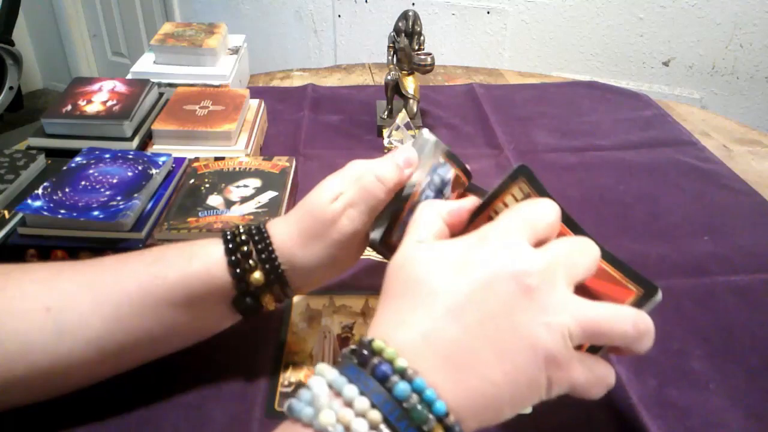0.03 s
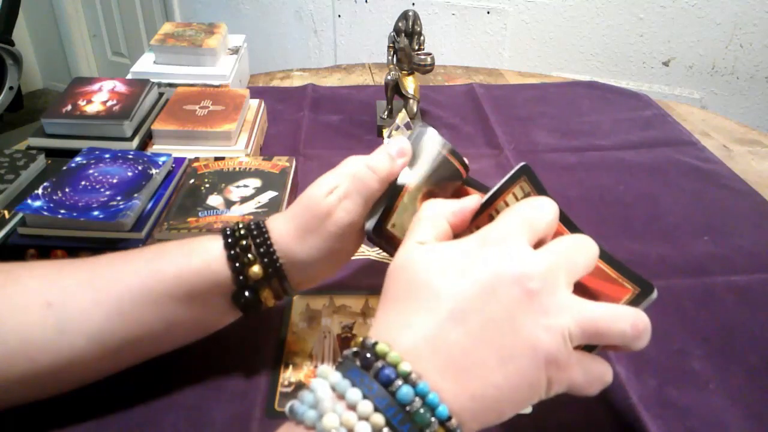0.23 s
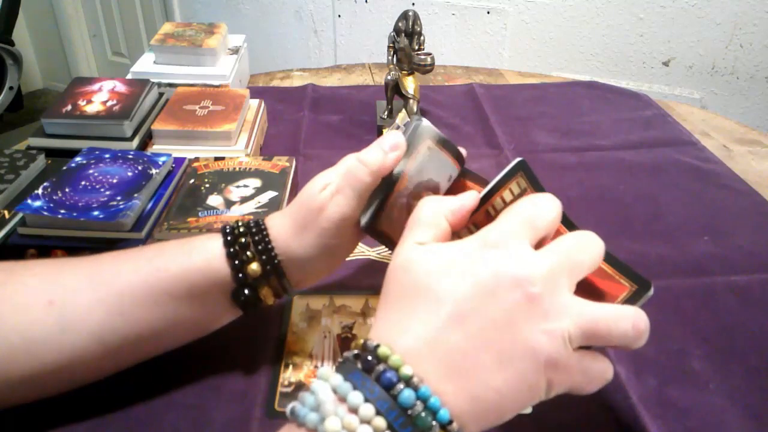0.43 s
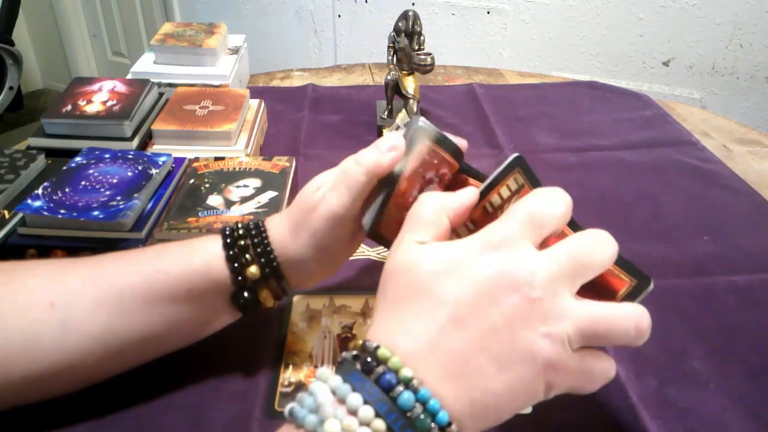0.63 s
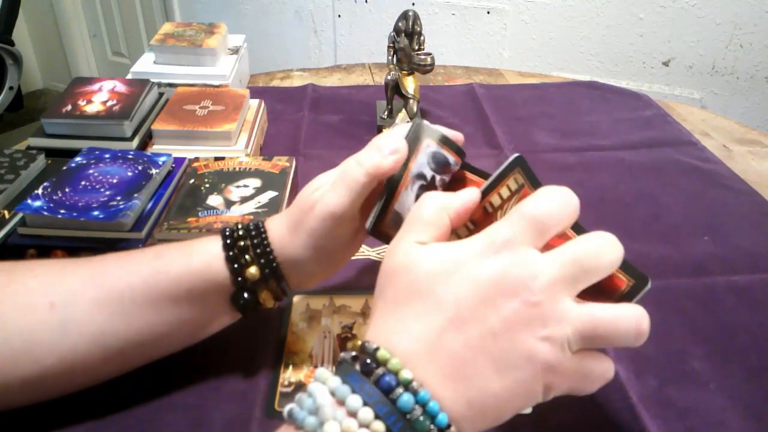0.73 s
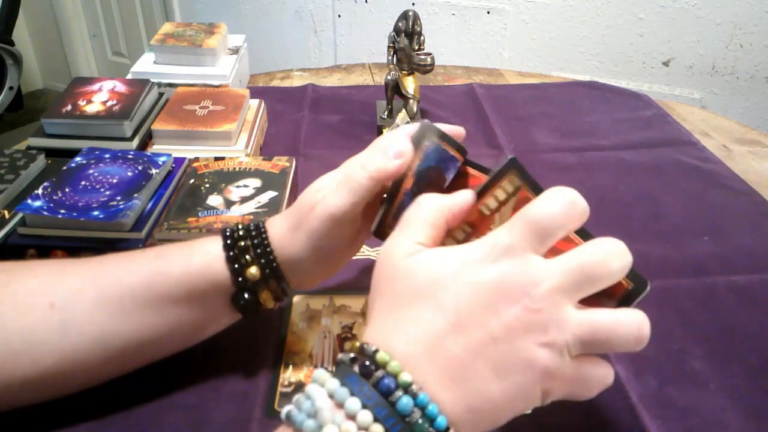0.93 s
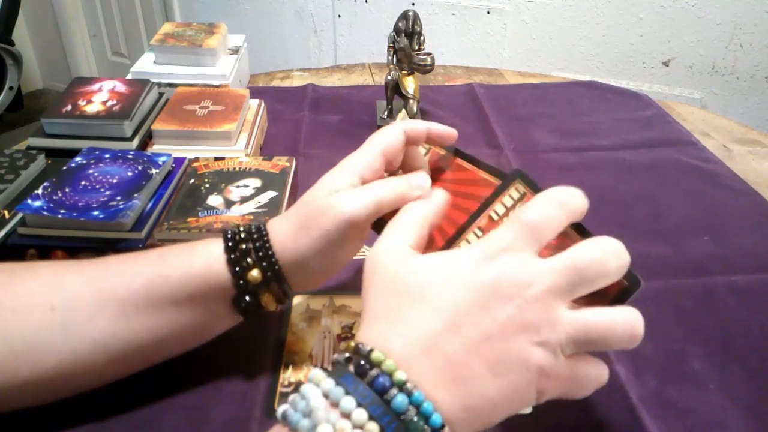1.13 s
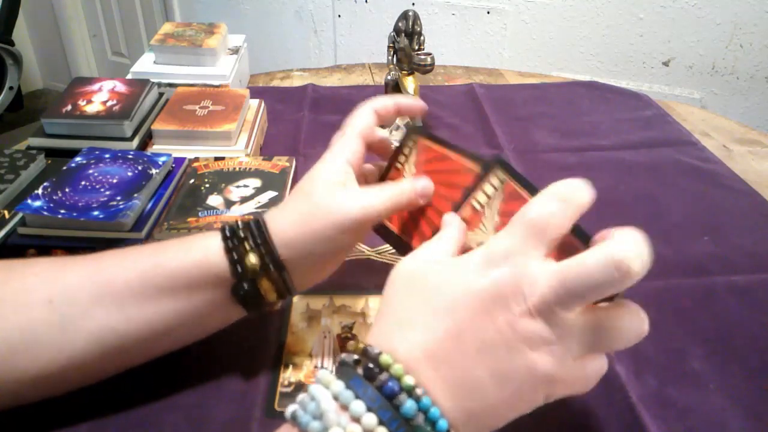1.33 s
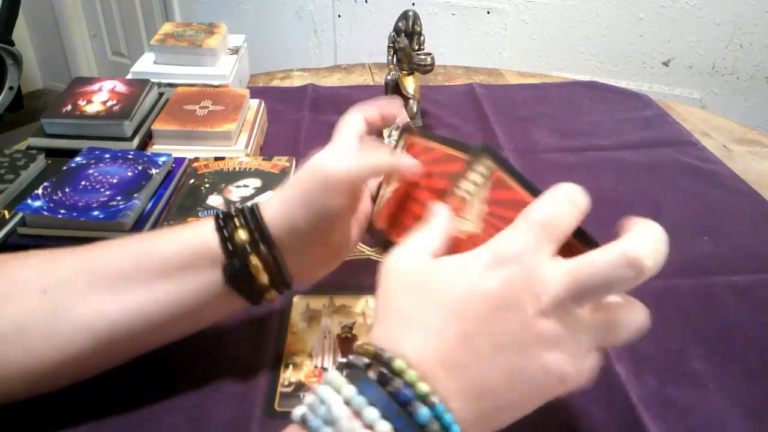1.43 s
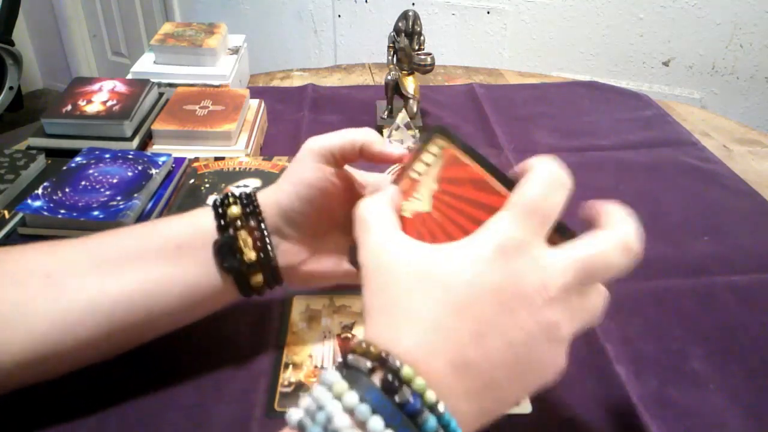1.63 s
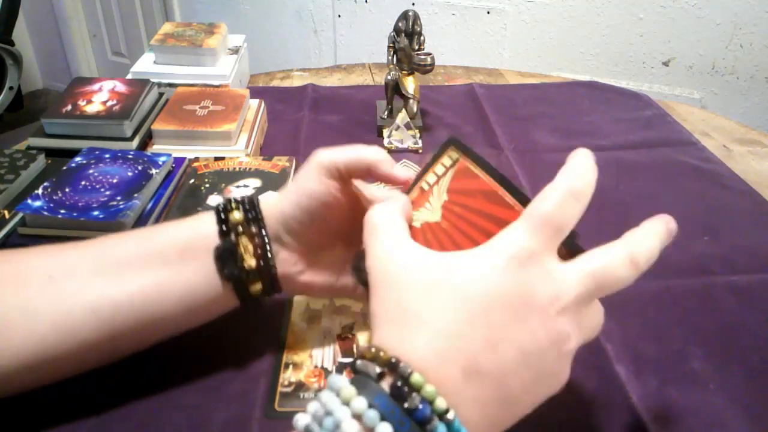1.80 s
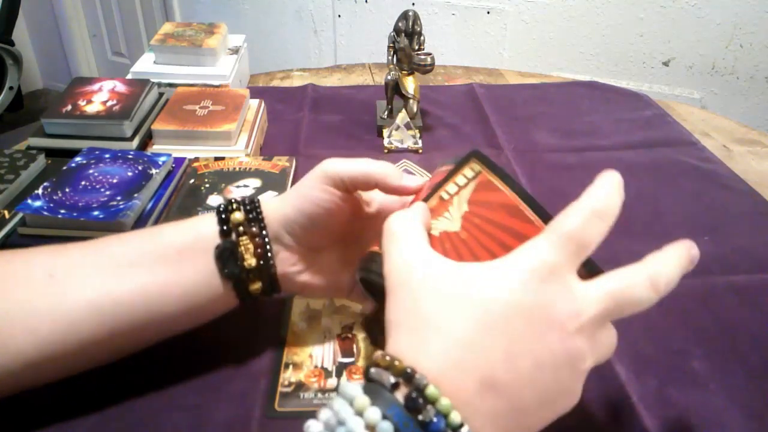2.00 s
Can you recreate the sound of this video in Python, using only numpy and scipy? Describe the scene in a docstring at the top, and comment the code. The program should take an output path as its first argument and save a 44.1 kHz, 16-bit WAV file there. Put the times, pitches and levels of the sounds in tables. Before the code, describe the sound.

Card deck shuffle in a quiet room: crisp slaps, papery clicks and slides, then soft squaring

```python
"""A deck of large cards is shuffled overhand above a cloth-covered table in a small room.
Packets slap onto the pile and single edges tick: bursts of noise coloured by the card stock.
Between the slaps, card faces slide with grainy noise, and falling packets push soft puffs of air.
After a pause the deck is tapped and slid square, with brief rings and tiny squeaks.
Short echoes, one bright echo made of hiss, quiet room air and hum surround it."""
import sys
import numpy as np
from scipy import signal
from scipy.fft import rfft, irfft
from scipy.io import wavfile
from scipy.ndimage import uniform_filter1d, minimum_filter1d

SR = 44100
rng = np.random.default_rng(int(sys.argv[2]) if len(sys.argv) > 2 else 0)


def put_to_file(sound):
    """Save the sound as 16-bit audio at rate SR, in the file named by the first command-line argument."""
    columns = np.atleast_2d(sound).T  # one column per channel
    safe = np.clip(columns, -1, 1)
    whole_steps = np.round(safe * 32767)
    wavfile.write(sys.argv[1], SR, whole_steps.astype(np.int16))


N = 90890
T = np.arange(N) / SR  # time of every sample, in seconds

# Quiet room air: pitch_hz, level_db (relative colour)
AIR_COLOUR = [(50, -5.5), (170, -4), (2000, -27.5), (4500, -44)]
# Steady hum tones: pitch_hz, level_db
HUM_TONES = [(59.2, -67.5), (120, -76), (161.5, -72)]
# Time the echoes take to fall by 60 dB: pitch_hz, fade_s
ECHO_FADE = [(4500, 0.2358), (6500, 0.37), (11000, 0.22)]
# Colour of the echoes: pitch_hz, level_db
ECHO_COLOUR = [(4500, -13.5), (8000, -8), (14000, -11.5)]
# Loudness curve of the bright room echo after the sharp edge tick: time_s, level_db
BRIGHT_ECHO_LEVEL = [(1.105, -71), (1.115, -42), (1.16, -58.5), (1.22, -56.5), (1.38, -98)]
# Colour of that echo: pitch_hz, level_db (relative)
BRIGHT_ECHO_COLOUR = [(4000, -26.5), (6500, 4.5), (9700, -1.5), (11500, -28)]
# Air pushed out by falling packets, before the low cut: start_s, level_db
AIR_PUFFS = [(0.11, -30), (0.2365, -30), (0.366, -35), (.487, -34), (0.78, -35.5), (.91, -38.5),
             (0.989, -42)]
# Loudness curve of faces sliding over each other: time_s, level_db
SLIDE_LEVEL = [(0, -41.5), (.12, -36.5), (.45, -43.5), (.51, -35.5), (.745, -47.5), (.81, -34),
               (.89, -49.5), (.95, -34.5), (1.05, -49), (1.095, -42), (1.31, -79.5), (1.56, -79.5),
               (1.62, -58.5), (1.7, -59.5), (1.727, -31), (1.94, -68.5), (2.05, -46)]
# Colour of the slide with the deck open, then closed: pitch_hz, level_db (relative)
OPEN_COLOUR = [(50, -2), (180, -8.5), (700, -2), (3000, -4.5), (4500, -23.5), (8000, -25), (11300, -35.5)]
CLOSED_COLOUR = [(300, -25), (1760, 7.5), (2400, -11.5), (3200, -7.5), (4500, -27), (6500, -23),
                 (16000, -46)]
# Fingers tapping the closed deck: start_s, level_db
FINGER_TAPS = [(1.447, -64), (1.4642, -63.5), (1.5843, -50), (1.6025, -40), (1.6153, -36)]
# Fingers catching as they slide the deck square: start_s, level_db, pitch_hz
FINGER_SQUEAKS = [(1.7274, -26, 1680), (1.7341, -38, 1620), (1.8106, -39, 1590), (1.8406, -40.5, 1735),
                  (1.9718, -44, 1867), (2.0325, -39.5, 1690), (2.036, -40, 1740), (2.0444, -38.5, 1520)]
# Colour of card striking card: pitch_hz, level_db (relative)
CARD_COLOUR = [(330, -14), (620, -3), (1800, -2), (3000, -2.5), (3600, -11), (4500, -25.5), (7500, -25),
               (11300, -38.5), (13200, -27), (16500, -53)]
# Single card edges flicking past: start_s, level_db, body_db, treble_db
EDGE_TICKS = [(.0305, -24, 9.5, 0), (.043, -21, 4, -1.5), (.0668, -20, 10, -1.5), (.0945, -29, 0, -8),
              (.203, -25, 7.5, -10.5), (.2127, -24, 10, 5.5), (.2335, -27, -2, -5.5), (.2411, -26.5, 2, -7),
              (.2458, -25.5, 12.5, 0), (.2875, -24.5, -1.5, -12.5), (.4107, -22.5, 2, 1.5),
              (.47, -25, -7.5, 2), (.5455, -30, 2, 8), (.614, -28.5, 0, 2), (.6298, -26.5, 4, -0.5),
              (.651, -30.5, 1, 9), (.6925, -28.5, 1.5, 7.5), (.706, -29, 2, 1.5), (.762, -25, 1.5, 3.5),
              (.7867, -21, 6, 0.5), (.7915, -21.5, 1.5, 7.5), (.905, -30, -19, -7), (1.082, -31, 2, -4),
              (1.1051, -25.5, -9.5, 14), (1.701, -40, 8, 1), (1.798, -44, 6, 14), (2.031, -45, -5, 15)]
# Packets landing: start_s, level_db, length_s, body_db, flex_hz, treble_db
PACKET_SLAPS = [(0.1099, -6, 0.0053, 0.5, 1710, -8), (0.3031, -8, .0048, 1, 2190, -6),
                (0.366, -14, 0.0009, 2.5, 1940, 7), (0.4862, -6.5, 0.0023, -8.5, 3240, 1.5),
                (0.7776, -9.5, 0.0033, -1, 1680, 1), (0.921, -9.5, 0.0025, -16, 2280, -0.5),
                (0.987, -22, 0.00254, 7.5, 1500, 5.5), (1.198, -26.5, 0.0011, -14.5, 2820, 14.5),
                (1.717, -26.5, 0.0038, -5, 3300, 3), (2.0573, -23, 0.0016, -21.5, 1500, -4)]

FLOOR_DB = -68  # room air
ECHO_S, EARLY_DB, EARLY_S = 0.0076, 8, 0.015  # first echo, extra early strength and its fading time
PUFF_S, PUFF_HZ = .003, 30  # half-width of a puff, low cut
CLOSED_S = 1.5  # from here the slide is that of the closed deck
GRAINS_PER_S, GRAIN_SPREAD_DB, CATCH_S = 320, 2, 0.0014  # catches of sliding faces, and their fading time
DECK_HZ, DECK_UPPER_HZ, DECK_T60 = 1570, 2822, 0.012  # two deck tones; seconds to fall by 60 dB
BODY_HZ, TREBLE_HZ, AIR_HZ = 1080, 4500, 10800  # edges of the body, treble and top ranges
FLEX_DB, FLEX_OCTAVES = 8.5, 0.16  # height and half-width of the card's flex resonance
SPOT_HZ, EDGE_S = 1640, .0015  # typical flex resonance and contact time of one card
LEAD_S, LEAD_DB = .002, -30  # an edge scrapes faintly just before it lands
ATTACK_S, TICK_S = .0007, .002  # rise of a contact; finger contact time and rise of a ring
RELEASE_S, EDGE_RELEASE_S = 0.0015, 0.0013  # fading time after packets, and after edges or fingers
CUT_HZ = 16400  # upper limit of the sound


def amp(db):
    """Turns decibels into a plain multiplier."""
    return 10 ** (np.asarray(db) / 20)


def unit(x):
    """Scales a sound to an average (rms) strength of 1."""
    return x / np.sqrt(np.mean(x ** 2) + 1e-20)


def read(points, hz):
    """Reads a curve between its points, with pitch spaced in octaves."""
    f, value = np.transpose(points)
    return np.interp(np.log(hz + 1), np.log(f + 1), value)


def level(points):
    """Turns a loudness curve in dB into a multiplier over time."""
    return amp(np.interp(T, *np.transpose(points)))


def add(mix, s, sound):
    """Mixes a sound in at time s, in seconds."""
    part = mix[max(round(s * SR), 0):][:len(sound)]
    part += sound[:len(part)]


def tint(x, points):
    """Colours a sound by pitch and sets its rms to 1."""
    hz = np.fft.rfftfreq(len(x), 1 / SR)
    return unit(irfft(rfft(x) * amp(read(points, hz)), len(x)))


def causal(db):
    """Builds a filter that reacts as promptly as its colour allows (minimum phase)."""
    log_gain = np.log(amp(np.r_[db, db[-2:0:-1]]))
    return np.exp(np.conj(signal.hilbert(log_gain)))[:len(db)]


def at_level(x, db):
    """Sets the level of a click, with its energy averaged over 5 ms."""
    return x * amp(db) * np.sqrt(.005 * SR / np.sum(x ** 2))


def contact(length, release, body_db, flex_hz, treble_db, size=2048, order=33):
    """A short rush of tiny collisions, heard through the card stock."""
    t = np.arange(size) / SR - LEAD_S
    hz = np.fft.rfftfreq(size, 1 / SR)
    rise = np.clip(t / ATTACK_S, amp(LEAD_DB), 1)
    fade = np.exp(-np.maximum(t - length, 0) / release)
    rush = rng.standard_normal(size) ** 3 * rise * fade  # cubing makes the collisions spiky
    spectrum = rfft(rush)
    # The rush's own broad colour is taken out, so the card colour decides
    uneven_db = 10 * np.log10(uniform_filter1d(abs(spectrum) ** 2, order) + 1e-12)

    def above(edge):
        return 1 / (1 + (edge / (hz + 1)) ** 10)

    body = body_db * (1 - above(BODY_HZ))
    treble = treble_db * (above(TREBLE_HZ) - above(AIR_HZ) / 2)  # half as much at the very top
    flex = FLEX_DB / (1 + (np.log2((hz + 1) / flex_hz) / FLEX_OCTAVES) ** 2)
    colour_db = read(CARD_COLOUR, hz) + body + treble + flex
    damped = np.exp(-np.maximum(t - 2 * length, 0) / (2 * length))  # each contact fades soon after it ends
    return irfft(spectrum * causal(colour_db - uneven_db)) * damped


def background():
    """Quiet room air is coloured noise; electrical hum is a few steady tones."""
    hum = 0
    for hz, db in HUM_TONES:
        hum = hum + amp(db) * np.sqrt(2) * np.sin(2 * np.pi * (hz * T + rng.random()))
    return hum + amp(FLOOR_DB) * tint(rng.standard_normal(N), AIR_COLOUR)


def room(x, size=22050, order=12):
    """Strong early reflections from table and wall, then a short tail that fades by pitch."""
    t = np.arange(size) / SR
    late = np.maximum(t - ECHO_S, 0)
    # Scattered echoes of either sign, about one in every `order` samples
    echoes = rng.choice([-1., 1.], size) * (rng.random(size) < 1 / order) * (t > ECHO_S)
    echoes = echoes * (1 + amp(EARLY_DB) * np.exp(-late / EARLY_S))
    hz, when, bands = signal.stft(echoes, SR, nperseg=256)
    bands = bands * amp(-60 * when / read(ECHO_FADE, hz)[:, None])
    tail = signal.istft(bands, SR, nperseg=256)[1][:size]
    colour = causal(read(ECHO_COLOUR, np.fft.rfftfreq(size, 1 / SR)))
    tail = irfft(rfft(tail / np.linalg.norm(tail)) * colour)
    return signal.fftconvolve(x, tail)[:N]


def bright_echo():
    """A hissing room echo follows the brightest edge tick: coloured noise that dies away."""
    return tint(rng.standard_normal(N), BRIGHT_ECHO_COLOUR) * level(BRIGHT_ECHO_LEVEL)


def puffs():
    """Falling packets give soft, low pushes of air: smooth bumps of pressure."""
    pushes = sum(amp(db) * np.exp(-((T - s) / PUFF_S) ** 2) for s, db in AIR_PUFFS)
    return signal.lfilter(*signal.butter(1, PUFF_HZ, "highpass", fs=SR), pushes)


def rub(colour, smooth, count=2):
    """Brief catches, each a tiny burst, shared between dull and bright spots, over smooth noise."""
    out = smooth * rng.standard_normal(N)
    fade = np.exp(-1 / (CATCH_S * SR))
    for kind in ("lowpass", "highpass"):
        caught = rng.random(N) < GRAINS_PER_S / count / SR
        starts = caught * amp(GRAIN_SPREAD_DB * np.minimum(rng.exponential(1, N), 3))
        bursts = signal.lfilter([1], [1, -fade], starts) * rng.standard_normal(N)
        out += signal.lfilter(*signal.butter(1, SPOT_HZ, kind, fs=SR), unit(bursts))
    return tint(out, colour)


def slide():
    """Card faces rub over each other, more smoothly once the deck is closed."""
    faces = np.where(T < CLOSED_S, rub(OPEN_COLOUR, smooth=0.85), rub(CLOSED_COLOUR, smooth=1.0))
    return faces * level(SLIDE_LEVEL)


def ring(hz, size=2048):
    """One brief, softly started tone of the closed deck."""
    t = np.arange(size) / SR
    tone = np.sin(2 * np.pi * (hz * t + rng.random()))
    return amp(-60 * t / DECK_T60) * tone * np.minimum(t / TICK_S, 1) ** 2


def fingers(upper_db=-3, click_db=-8, treble_db=-6):
    """Fingertips knock the closed deck, ringing both its tones, or catch on it with a tiny squeak."""
    out = np.zeros(N)
    for s, db in FINGER_TAPS:
        knock = ring(DECK_HZ) + amp(upper_db) * ring(DECK_UPPER_HZ)
        add(out, s, at_level(knock, db))
        click = contact(TICK_S, EDGE_RELEASE_S, 0, DECK_HZ, treble_db)
        add(out, s - LEAD_S, at_level(click, db + click_db))
    for s, db, hz in FINGER_SQUEAKS:
        add(out, s, at_level(ring(hz), db))
    return out


def cards():
    """Packets slap down and single edges tick, each a rush of collisions shaped by the bending card."""
    out = np.zeros(N)
    for s, db, length, body_db, flex_hz, treble_db in PACKET_SLAPS:
        slap = contact(length, RELEASE_S, body_db, flex_hz, treble_db)
        add(out, s - LEAD_S, at_level(slap, db))
    for s, db, body_db, treble_db in EDGE_TICKS:
        flex_hz = SPOT_HZ * 2 ** (-body_db / 10)  # more body, lower flex
        tick = contact(EDGE_S, EDGE_RELEASE_S, body_db, flex_hz, treble_db)
        add(out, s - LEAD_S, at_level(tick, db))
    return out


def scene():
    """Adds up cards and fingers with their echoes, the slide, the puffs and the background."""
    hits = cards() + fingers()
    echoes = room(hits) + bright_echo()
    return (hits + echoes + slide() + puffs() + background())[None]


def record(dry):
    """A fast limiter holds peaks at full scale; then the highest pitches are cut."""
    need = np.minimum(1 / (abs(dry) + 1e-9), 1)
    gain = uniform_filter1d(minimum_filter1d(need, size=45), size=45)  # 45 samples, about 1 ms
    high_cut = signal.firwin(255, CUT_HZ, window=("kaiser", 9), fs=SR)
    return signal.oaconvolve(dry * gain, high_cut[None], "same")


dry = scene()
out = record(dry)
put_to_file(out)
```